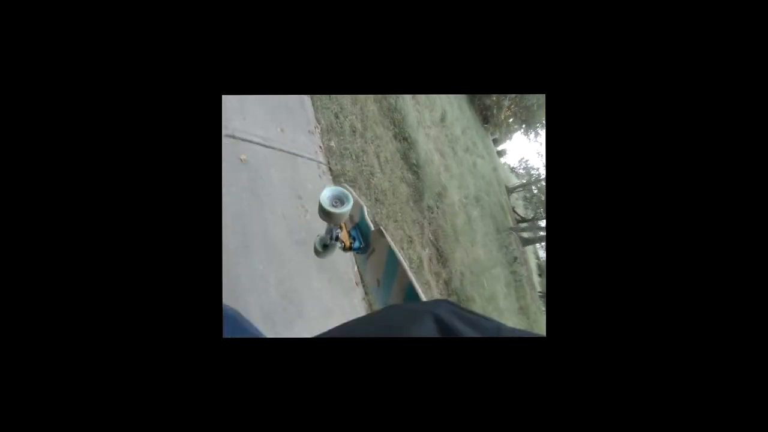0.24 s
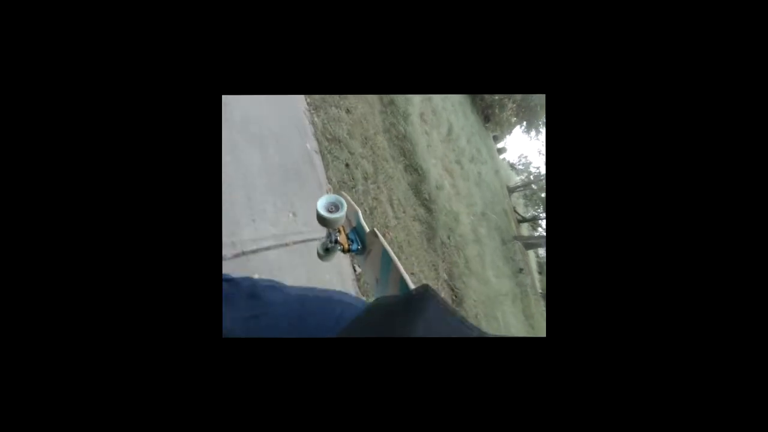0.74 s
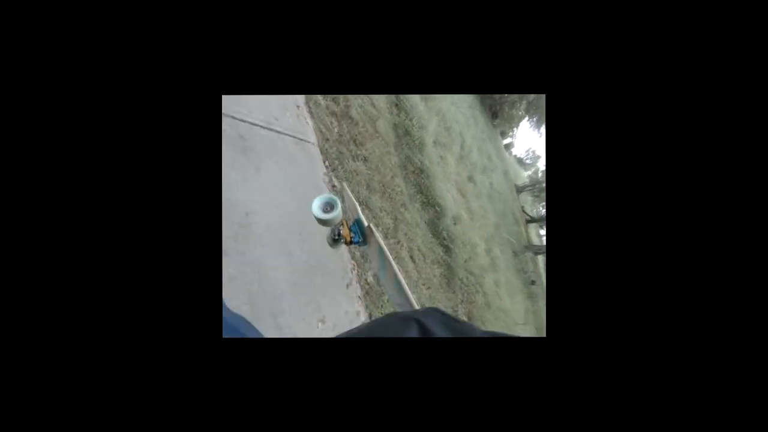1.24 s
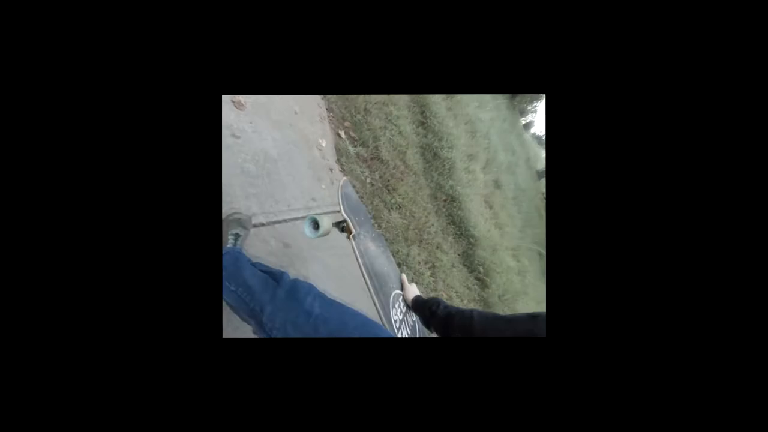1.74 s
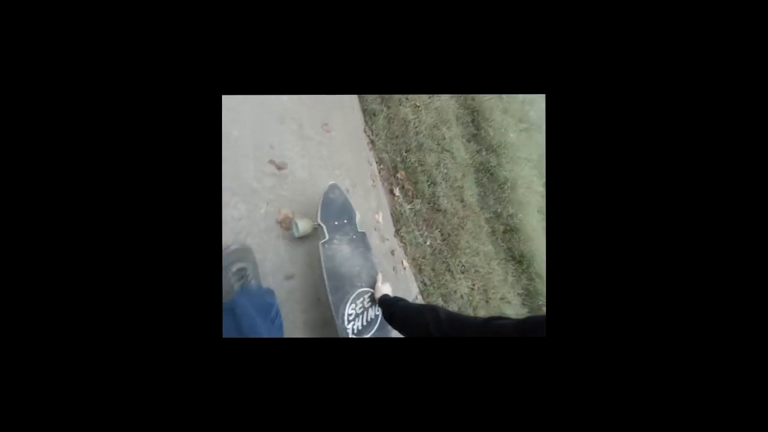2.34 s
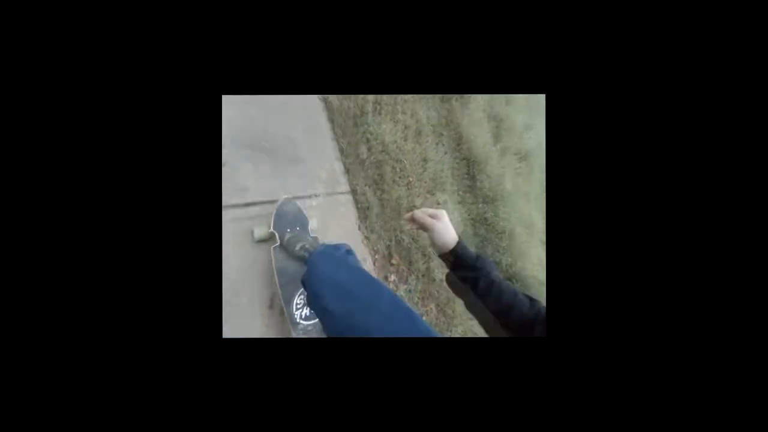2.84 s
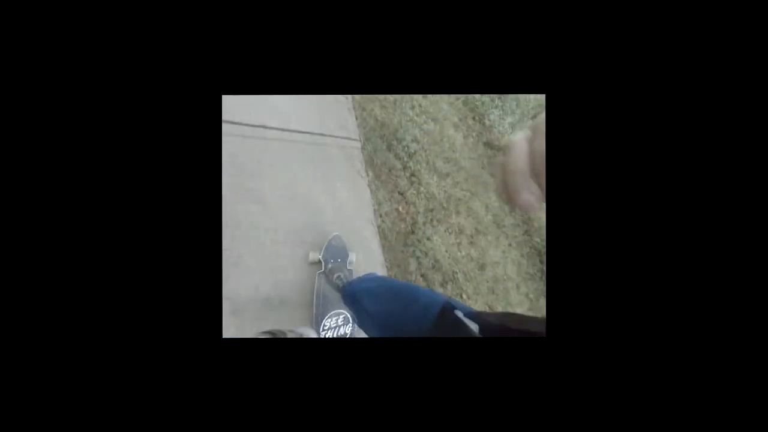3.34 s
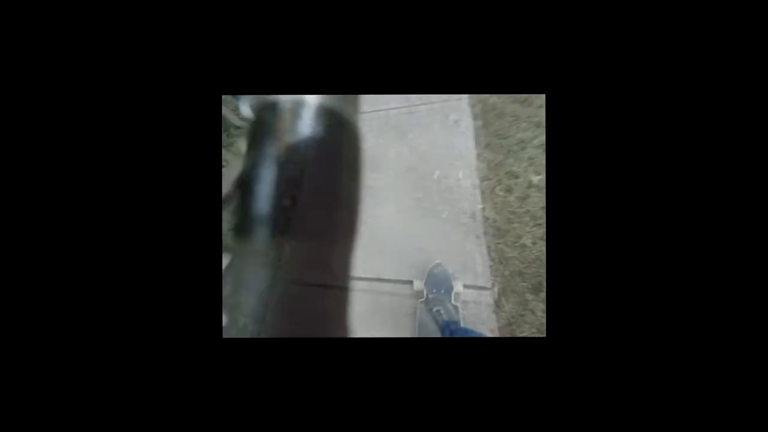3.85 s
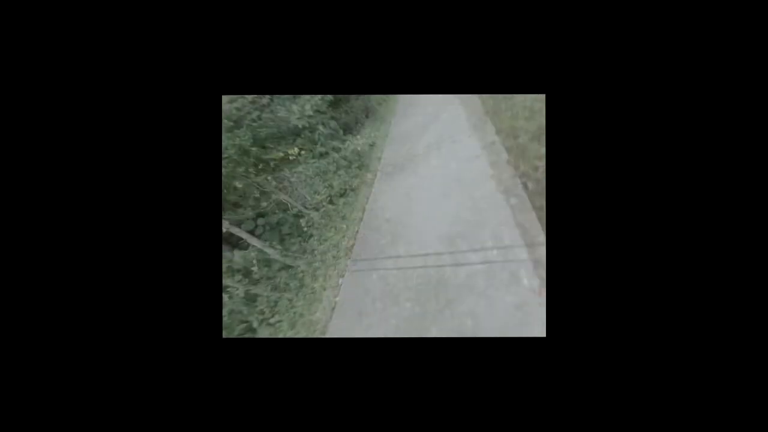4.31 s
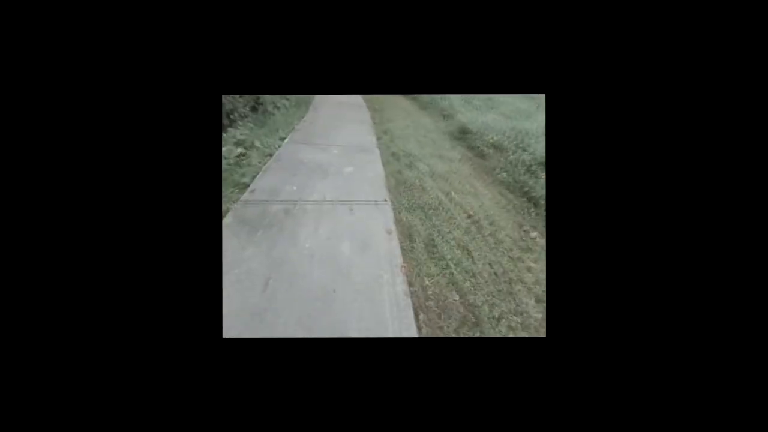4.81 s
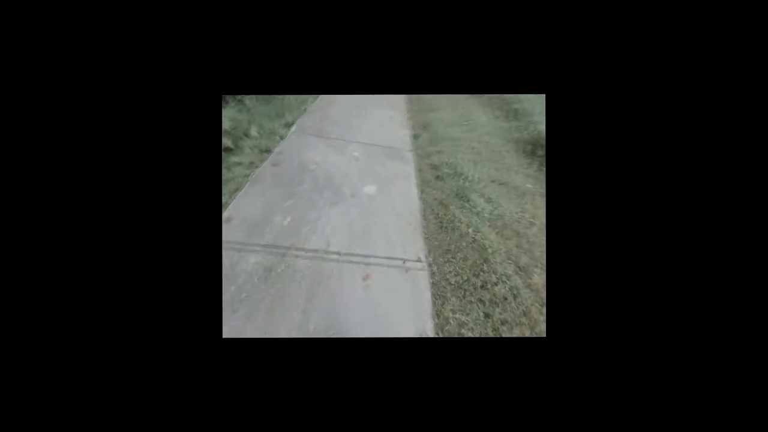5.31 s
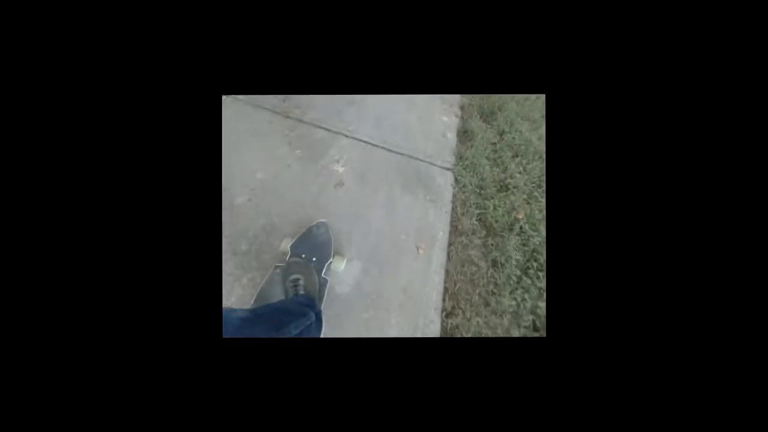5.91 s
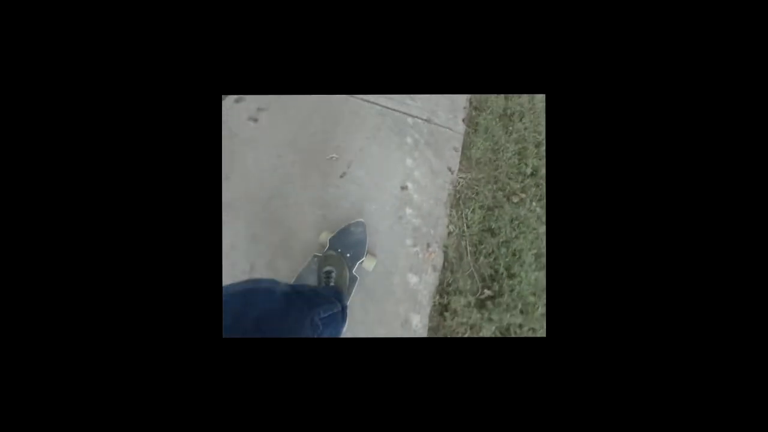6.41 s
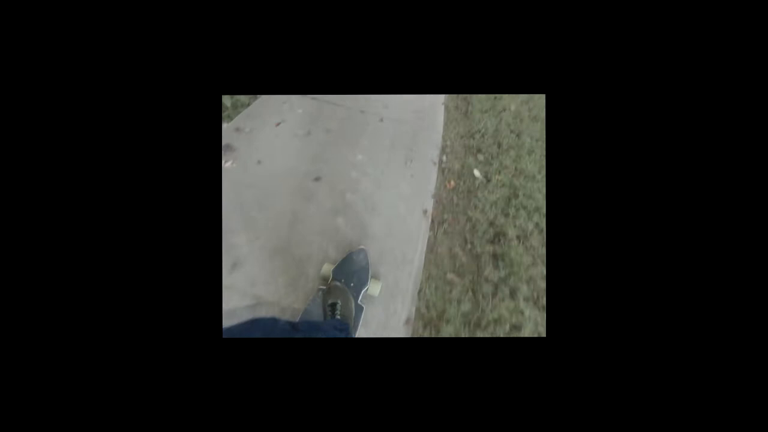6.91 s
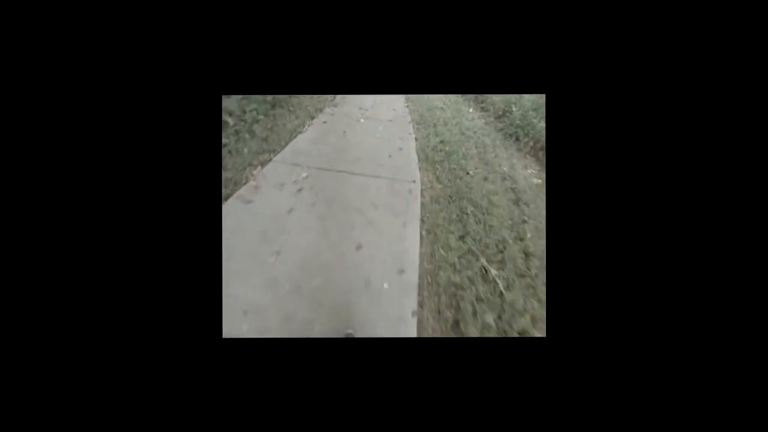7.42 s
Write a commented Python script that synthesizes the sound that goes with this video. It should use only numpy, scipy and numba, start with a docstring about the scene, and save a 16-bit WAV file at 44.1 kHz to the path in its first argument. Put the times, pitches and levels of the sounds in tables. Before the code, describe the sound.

A handheld stereo microphone hears a quiet outdoor path: distant traffic, leaves and soft wind rumble. From 0.2 to 2.3 s, shoes crunch sparsely over grit, with scuffs, dull heel thumps near 1.9 s, tiny dry high rattles and faint gliding bird whistles during the first 1.3 s. At about 2.4 s a longboard drops onto concrete in a rapid hollow clatter with a short woody ring, already rolling. Scrapes and gritty steps follow as the rider mounts around 2.9-3.2 s. The deck then rumbles low and rough, slab joints knocking every 0.3-0.5 s as tight clusters of thuds with small metallic ticks. From 3.3 to 4.6 s, creaks, sharp plastic clicks and rubbing on the microphone housing are loud and close. Afterwards handling thins out; rolling swells, with especially heavy knocks near 4.8, 5.25, 6.3, 6.9 and 7.4 s, continuing to the cut at about 7.7 s.

```python
"""Longboard rolling off over slab joints

A walker crunches over grit, drops a longboard, steps on and rolls along a concrete path.
Noise from the concrete drives the deck modes; the dropped board and grooved joints strike them.
Grit, rubbing and the creaking hand-held housing are noise bursts, many ringing cavities at its two ports.
A dry high rattle, gliding bird whistles, heel thumps, far traffic and leaves, and wind rumble complete it.
"""
import sys
import numpy as np
from scipy import signal
from scipy.fft import rfft, irfft
from scipy.io import wavfile
from scipy.ndimage import uniform_filter1d
from numba import njit

SR = 44100
rng = np.random.default_rng(int(sys.argv[2]) if len(sys.argv) > 2 else 0)


def bounce(signal):
    """Save signal as a 16-bit WAV file at the path given by the first command-line argument."""
    frames = np.transpose(np.atleast_2d(signal))
    limited = np.clip(frames, -1, 1)
    pcm = np.round(limited * 32767).astype(np.int16)
    wavfile.write(sys.argv[1], SR, pcm)


N = 337806
T = np.arange(N) / SR

# wheels on concrete: (time [s], deck rumble level [dB], wheel growl level [dB])
ROLL = [(2.395, -28, -42), (2.61, -36, -45.5), (3.09, -36.5, -43.5), (3.32, -29, -44.5), (3.72, -34.5, -65),
        (3.92, -38, -59), (4.29, -35, -53), (4.48, -42.5, -53), (4.6, -35.5, -49.5), (4.89, -36.5, -53.5),
        (5.2, -35.5, -51.5), (5.54, -33.5, -51.5), (5.85, -28.5, -45), (6.22, -27.5, -40),
        (6.4, -27, -42.5), (6.56, -27, -43), (7.04, -25.5, -44), (7.44, -28, -48), (7.66, -26.5, -45)]
# deck and trucks: (frequency [Hz], level [dB], t60 [s]); row 0 is whole-board flex, its pitch set by FLEX
DECK = [(138.2, -5.5, 0.064), (169.4, 1.5, 0.058), (233, 9.5, 0.014), (380.4, 5, 0.028), (483.5, 1, 0.042),
        (533, 0.5, 0.047), (710, -0.5, 0.02), (987, -5.5, 0.044)]
# whole-board flex as the rider's weight shifts: (time [s], pitch [Hz], level against the rumble [dB])
FLEX = [(2.4, 154, -2), (2.52, 131, -3), (2.56, 145, -6), (2.62, 121.5, -2.5), (3.35, 138.4, 3.5),
        (3.6, 129, 5.5), (3.72, 132, 13.5), (3.86, 146, 1.5), (4.48, 125, 10.5), (4.51, 149, 5.5),
        (5.15, 146, 2.5), (5.58, 164, -1), (5.68, 145, 1.5), (6.11, 151, -7.5), (6.22, 140, -8),
        (6.63, 149, -12), (6.9, 135, 4), (7.0, 136, 4), (7.16, 139, 2), (7.62, 148.5, -1), (7.66, 135, 3)]
# dropped and trodden board: (deepest swing [s], blow level [dB], singing against the blow [dB])
BOUNCES = [(2.4117, -12, -14), (2.421, -16, -20), (2.4345, -16, -3), (2.4491, -15.5, -19), (2.4558, -26, 2),
           (2.4764, -27, 11), (2.482, -21, 7.5), (2.4974, -26, -4), (2.5559, -17, -4.5), (2.602, -32, 8),
           (2.655, -34.5, 4.5), (2.737, -26, -1), (2.8085, -20, -6), (2.8151, -19.5, 0),
           (2.846, -24.5, -17), (2.92, -31, 3.5), (2.989, -24.5, -12), (3.218, -21.5, -13),
           (4.443, -28.5, -20), (4.762, -26.5, -20), (5.2389, -23, -20), (5.3693, -19, -24)]
# slab joints: (middle groove [s], blow level [dB], groove spacing [s], first groove against middle [dB],
# last groove against middle [dB], axle clack against the blow [dB])
JOINTS = [(3.031, -18.5, 0.0098, 2.5, -1.5, -22), (3.4985, -14, 0.017, -3, -12, -10.5),
          (3.9145, -15, 0.0054, 6, -35, -14.5), (4.3768, -17, 0.0073, 3, -29, -19),
          (4.789, -9.5, 0.0088, -3, -2.5, -20.5), (5.254, -10.5, 0.0084, 0.5, -14, -23),
          (5.6594, -16, 0.0092, 8, 7.5, -22.5), (6.009, -12, 0.011, 3, -5.5, -19),
          (6.3009, -10, .0136, -3, -13, -17), (6.5997, -11, 0.01051, 1.5, -6, -11.5),
          (6.8657, -5, 0.0094, -9.5, -29, -19), (7.1506, -19.5, 0.0063, 11, -3.5, -16.5),
          (7.4399, -6, 0.0067, -36, -15, -20.5)]
# sideways place of sounds from the ground: (time [s], left minus right [dB])
GROUND_PAN = [(0, 0), (1.3, -4), (2.05, -12), (2.38, -3), (3.45, -1.5), (3.72, -5), (3.95, -2), (4.48, -5),
              (4.6, -2.5), (6, 0), (7.66, -1.5)]
# grit under shoes: (time [s], crack level [dB], sole thud against the crack [dB])
GRIT = [(0.2255, -23, -4.5), (0.246, -28, -8), (0.2774, -30.5, -0.5), (0.389, -36, -10),
        (0.6858, -30, -9.5), (0.764, -29, -3), (0.7735, -30.5, -11), (0.8115, -21.5, -24),
        (0.831, -29, -10), (0.839, -30, -10), (0.8461, -22.5, -14), (0.852, -27.5, -18),
        (0.863, -25.5, -20), (1.044, -32, -5), (1.258, -48, 10.5), (1.3021, -16, -26), (1.3212, -22, 1),
        (1.439, -32, -29), (1.491, -37, -26), (1.511, -35, -13), (1.529, -31.5, -13), (1.647, -35, -5.5),
        (1.7666, -27, -7.5), (1.7922, -24.5, -5.5), (1.8112, -27.5, 1), (1.8443, -25, -9), (1.903, -37, -9),
        (1.918, -31, -11), (1.952, -27, -6.5), (1.96, -27, -12), (1.973, -29, -11), (1.993, -25.5, 0.5),
        (2.0155, -22.5, -7.5), (2.047, -29, -2.5), (2.0775, -25.5, -4.5), (2.092, -23, -10),
        (2.134, -29, -11), (2.219, -36.5, -4), (2.272, -38, -9), (2.298, -31, -12), (2.4072, -24, 5.5),
        (2.5352, -27, 1.5), (2.572, -27, -20), (2.715, -39, -3), (2.737, -37, 3), (2.76, -32.5, 1),
        (2.8022, -26, -11), (2.8184, -36, 0), (2.8738, -18, -0.5), (2.889, -20, -5), (2.909, -19, -7),
        (2.92, -26, -5), (2.9443, -29, -4), (2.9826, -32, -4), (3.0167, -36, -13), (3.0326, -30, 1.5),
        (3.093, -29, -15), (3.147, -22, -3), (3.0596, -20.5, -21), (3.1141, -23, 4), (3.18, -23.5, 3),
        (3.2169, -25, -6)]
# heels landing: (time [s], push level [dB])
HEELS = [(1.868, -33), (1.956, -19), (1.978, -22.5)]
# housing slips: (time [s], level [dB], brightness [dB], slipping part pitch [Hz], t60 [s])
CLICKS = [(3.314, -27.5, -11, 4470, 0.038), (3.4219, -24.5, -1, 4030, 0.013),
          (3.436, -42, 6.5, 3850, 0.0077), (3.444, -23.5, -1.5, 2610, 0.018),
          (3.4672, -26, 6, 4840, 0.0071), (3.534, -18.5, -3, 2650, 0.026), (3.562, -25, -5, 4200, 0.035),
          (3.605, -24, 1, 5760, 0.038), (3.6382, -31, 4, 4430, 0.023), (3.6569, -14.5, -17, 3080, 0.052),
          (3.696, -16, -1, 4420, 0.022), (3.7269, -21.5, 0.5, 3030, 0.02), (3.7395, -26, 0, 5870, 0.038),
          (3.8756, -21, -3.5, 4170, 0.047), (3.9723, -51, 3.5, 5740, 0.05),
          (3.9894, -10.5, 0.5, 2620, 0.019), (4.135, -27, 0, 2660, 0.027), (4.155, -31, -13, 2600, 0.015),
          (4.2147, -34.5, 2, 3930, 0.068), (4.2257, -13.5, -1.5, 3280, 0.013),
          (4.285, -29, -1.5, 3900, 0.022), (4.3382, -18, -3, 2900, 0.021), (4.372, -9.5, -3, 4030, 0.012),
          (4.406, -30, -3, 4000, 0.015), (4.4377, -9, -2.5, 4200, 0.024),
          (4.4484, -12.5, -4.5, 2620, 0.019), (4.5019, -11, -3, 4300, 0.018),
          (4.562, -42.5, 1.5, 4160, 0.049), (4.62, -12, 0.5, 3700, 0.015), (5.006, -35.5, 2.5, 3630, 0.013),
          (5.1665, -27, -1.5, 3870, 0.026), (5.182, -30, -3, 2600, 0.017), (5.195, -30, -10, 2600, 0.02),
          (5.2779, -28, -2.5, 3750, 0.018), (5.347, -42.5, 2.5, 2700, 0.012),
          (5.5141, -28.5, -1.5, 2420, 0.016), (5.781, -43.5, 3, 1750, 0.022),
          (5.794, -43.5, 0, 1790, 0.072), (6.112, -37.5, -0.5, 2460, 0.021),
          (6.145, -34, -1.5, 2660, 0.026), (6.1886, -48.5, 5.5, 1850, 0.022),
          (7.2848, -50.5, 7.5, 5000, 0.021), (7.56, -40.5, -0.5, 3520, 0.052)]
# slipping part, upper cavities, treble: (level at brightness 0 [dB], slope [dB per dB of brightness])
CLICK_COLOUR = [(-6, 3.5), (-1, 3), (-8, 4.5)]
# cavities around the ports: (frequency [Hz], width [Hz], level [dB], left minus right [dB])
HOUSING = [(1390, 356, 13, 1.5), (2774, 350, 3, -6), (3744, 950, 4.5, -2.5), (4880, 250, -2, 1)]
# treble cavities, same columns: (frequency [Hz], width [Hz], level [dB], left minus right [dB])
HOUSING_TOP = [(5900, 1600, -1, -11), (8520, 2120, 0.5, -3.5), (12800, 2100, -10, 1.5)]
# steady brushing of clothes: (time [s], level [dB], brightness [dB])
RUSTLE = [(0.0, -76, -45), (0.74, -74, -40), (1.77, -75, -45), (1.96, -63.5, -32), (2.24, -68.5, -29.5),
          (2.98, -56, -21.5), (3.41, -59.5, -18), (3.6, -44, -7), (3.92, -73.5, -20), (4.52, -58, -6),
          (4.97, -74.5, -1), (5.5, -55.5, -1), (5.99, -67, -7.5), (6.89, -62.5, -16.5), (7.66, -71, 6)]
# scuffing soles, sleeves on the housing: (start [s], length [s], level [dB], brightness [dB])
SCUFFS = [(0.193, 0.15, -56, -20.5), (0.73, 0.27, -55.5, -9), (0.885, 0.1, -50, -9),
          (1.278, 0.13, -51, -22), (1.427, 0.17, -60, -8), (1.725, 0.3, -60.5, -27), (1.938, 0.26, -45, -5),
          (2.376, 0.15, -43, -11.5), (2.528, 0.086, -47.5, 6), (2.854, 0.094, -37, -5),
          (2.991, 0.17, -46.5, -3), (3.088, 0.12, -50.5, -28), (3.32, 0.037, -49, -8),
          (3.433, 0.077, -47.5, 5), (3.507, 0.082, -50.5, 13), (3.66, 0.062, -35, 11),
          (3.719, 0.032, -32, 16.5), (3.73, 0.17, -52, -6), (3.838, 0.096, -43, 10),
          (4.039, 0.12, -53.5, 13), (4.126, 0.072, -40, 2.5), (4.199, 0.11, -46.5, -2),
          (4.56, 0.25, -55.5, 1), (5.152, 0.093, -52.5, -3), (5.338, 0.041, -56, 5), (5.55, 0.097, -57, -2),
          (6.117, 0.13, -61, 10), (6.634, 0.051, -60.5, 15.5), (7.263, 0.044, -39, 12),
          (7.282, 0.13, -68, 27.5), (7.545, 0.13, -58.5, 18)]
# dry high rattle: (start [s], length [s], mid-burst tick rate [per s], tick level [dB])
RATTLE = [(0.43, 0.021, 110, -40), (.91, 0.025, 190, -39.5), (1.049, .021, 100, -48),
          (1.082, 0.044, 71, -30.5), (1.131, 0.033, 136, -43.5), (1.381, 0.038, 200, -39.5),
          (1.431, 0.045, 370, -45), (1.517, 0.014, 140, -48), (2.196, 0.027, 160, -39.5),
          (2.373, 0.057, 170, -45), (2.688, 0.018, 200, -47.5), (2.891, 0.027, 180, -33),
          (3.311, 0.024, 130, -41)]
# distant birds: (start [s], length [s], from [Hz], to [Hz], level [dB])
BIRDS = [(0.36, 0.06, 3350, 3700, -57), (0.41, 0.1, 3720, 3530, -65), (0.498, 0.03, 2370, 2500, -56),
         (0.535, 0.045, 2600, 2450, -60), (0.608, 0.023, 3050, 3400, -51.5), (0.66, 0.023, 2070, 2120, -60),
         (0.97, 0.04, 2380, 2680, -58), (1.052, 0.029, 8100, 7450, -55), (1.08, 0.025, 2830, 3320, -54),
         (1.186, 0.11, 2810, 2740, -60)]
# far traffic and leaves: (frequency [Hz], relative spectral level [dB])
PARK = [(35, -13.5), (60, 2), (190, -8.5), (503, -11), (577, -15), (1450, -24), (2200, -38), (3120, -29.5),
        (7860, -56), (8820, -41), (15000, -103)]
# wind on the ports: (time [s], level [dB])
WIND = [(0, -44), (0.8, -42), (1.5, -45.5), (2.0, -44.5), (2.9, -38.5), (3.6, -37), (4.4, -34.5),
        (4.8, -48), (5.5, -48), (6.2, -50), (7.66, -43)]

# crunch level at brightness 0 [dB], its slope [dB per dB], treble level at brightness 0 [dB], its slope
RUSTLE_COLOUR, SCUFF_COLOUR = (4.5, -0.46, -1.5, 0), (1, -0.55, -7.5, 0.7852)

PORT_LAG_S = 18 / SR
STEP_ON_S = 3  # the deck is empty before this
FREE_DECK_HZ, FREE_DECK_T60_S, FREE_DECK_DB = 499, 0.16, -2
EMPTY_RUMBLE_DB = -4  # the unloaded deck rumbles less
FLEX_WANDER_DB = 1.2
FLEX_BLOW_EMPTY_DB, FLEX_BLOW_LOADED_DB = 0, 6.5
BOUNCE_CLACK_DB, TICK_DB = -16, -7.5  # against the blow, against the clack
JOINT_SING_DB = -15
SWING_S = 0.004  # a blow starts this long before the deepest swing
HISS_DB = -32.5  # wheel bearings against the rumble
DECK_SIDE_DB = -18  # upper deck modes reach the right port more strongly
GRIT_RISE_S, GRIT_SNAP_DB = 0.00027, 11.5
GRIT_TREBLE_DB, GRIT_BODY_DB = -20, -2  # treble and lowest cavity against the crack
CRACK_T60_S, TREBLE_T60_S, THUD_T60_S, GRIT_BODY_T60_S = 0.0045, 0.002, 0.057, 0.0032
HEEL_HZ, HEEL_T60_S = 109, 0.046
CLICK_RISE_S, CLICK_SNAP_DB = 0.0011, 16
PART_WIDTH_HZ, PART_PAN_DB = 340, -11.5
HANDLED_FROM_S = 3.3  # soles scrape before, the housing is rubbed after
SOLE_HZ, SOLE_DB = (1500, 3940), -3.5
BODY_DB = -11.5  # lowest cavity against the upper ones while the housing is rubbed
CRACK_MOST_DB = 3.5
RATTLE_HZ, RATTLE_T60_S, RATTLE_SPEEDUP = 8850, 0.02, 0.26
PARK_DB = -44.5
WIND_UPPER_DB, WIND_ALIKE = -9.5, 0.45
MIC_HZ, TOP_HZ = 8120, 16200
CEILING = 0.9


def board():
    """Rolling and blows shake the deck; thin decks radiate little bass, soft wheels pass little treble."""
    deck_db, growl_db = curves(ROLL)
    pan_db = curves(GROUND_PAN)[0]
    down = np.clip((T - ROLL[0][0]) / 0.029, 0, 1)
    rumble, growl = rolling(deck_db)
    deck = band(down * rumble + knocks(), 82, 824, order=3)
    heard = deck + down * undb(growl_db) * growl
    # opposite at the two ports
    side = undb(deck_db - 31.5 - 6.4 * pan_db) * down * unit(band(rng.standard_normal(N), 100, 720))
    side = side - undb(DECK_SIDE_DB) * band(np.roll(heard, int(0.00013 * SR)), 420, 900)
    hiss = unit(band(ports(0.93, lag_s=PORT_LAG_S), 1300, 2000))
    hiss = undb(deck_db + HISS_DB + 3.0 * walk(25)) * down * hiss
    panned = heard * undb(np.array([pan_db, -pan_db]) / 2)
    return panned + side * np.array([[1], [-1]]) + axle_clacks() + hiss


def rolling(deck_db):
    """Rough concrete, as uneven noise, excites deck modes, moving flex, the free deck and wheel growl."""
    flex_hz, share_db = curves(FLEX)
    flex_db = deck_db + share_db + FLEX_WANDER_DB * walk(3.25)
    road = undb(1.5 * walk(60)) * rng.standard_normal(N)
    modes = sum(undb(db) * unit(ring(road, hz, t60)) for hz, db, t60 in DECK[1:6])
    rumble = undb(deck_db + EMPTY_RUMBLE_DB * (T < STEP_ON_S)) * unit(band(modes, 84, 715, order=3))
    rumble = rumble + undb(flex_db) * unit(glide(road, flex_hz, DECK[0][2]))
    free = np.clip((STEP_ON_S - T) / 0.047, 0, 1) * unit(ring(road, FREE_DECK_HZ, FREE_DECK_T60_S))
    rumble = rumble + undb(deck_db + FREE_DECK_DB) * free
    growl = unit(undb(1.5 * walk(21)) * band(road, 582, 960, order=3))
    return rumble, growl


def knocks():
    """Each blow is a short soft push that rings the flex, the deck modes and a singing pair."""
    s, db, _, sing_db = blows()
    starts = ((s - SWING_S) * SR).astype(int)
    taps, sing = np.zeros(N), np.zeros(N)
    taps[starts] = -undb(db)
    sing[starts] = -undb(db + sing_db)
    flex = taps * undb(np.where(T < STEP_ON_S, FLEX_BLOW_EMPTY_DB, FLEX_BLOW_LOADED_DB))
    knock = undb(DECK[0][1]) * glide(flex, curves(FLEX)[0], DECK[0][2])
    # neighbouring modes swing opposite ways at the wheel
    for k, (hz, mode_db, t60) in enumerate(DECK[1:]):
        knock = knock + (-1) ** (k + 1) * undb(mode_db) * ring(taps, hz, t60)
    knock = knock + ring(sing, FREE_DECK_HZ, FREE_DECK_T60_S)
    knock = knock + undb(-4.0) * ring(sing, 1.09 * FREE_DECK_HZ, 0.56 * FREE_DECK_T60_S)
    push = np.hanning(int(0.0011 * SR))
    return np.convolve(knock, push / push.sum())[:N]


def axle_clacks():
    """Axle hardware answers each blow with a short high tick and a longer clack of noise."""
    s, db, clack_db, _ = blows()
    clack = bursts(s - 0.002, db + clack_db, 0.043, 0) * unit(band(ports(0.72), 320, 1256))
    tick = bursts(s - SWING_S, db + clack_db + TICK_DB, 0.0048, 0) * unit(band(ports(0.52), 1900, 4500))
    return clack + tick


def blows():
    """Times [s], levels, clack shares and singing shares [dB] of bounces and of three grooves a joint."""
    rows = [(s, db, BOUNCE_CLACK_DB, sing_db) for s, db, sing_db in BOUNCES]
    for s, db, gap_s, first_db, last_db, clack_db in JOINTS:
        for k, share_db in ((-0.986, first_db), (0, 0), (0.88, last_db)):
            rows.append((s + k * gap_s, db + share_db, clack_db, JOINT_SING_DB))
    return np.transpose(rows)


def grit():
    """Each crack is milliseconds of noise with a snap, a dull sole thud and a ringing lowest cavity."""
    s, db, thud_db = np.transpose(GRIT)
    pan_db = np.interp(s, *np.transpose(GROUND_PAN))
    noise = ports(0.91, lag_s=-0.00027)
    noise[:, ((s + GRIT_RISE_S) * SR).astype(int)] -= undb(GRIT_SNAP_DB)
    crack = bursts(s, db, CRACK_T60_S, pan_db) * noise
    treble = bursts(s, db + GRIT_TREBLE_DB, TREBLE_T60_S, pan_db) * noise
    thud = bursts(s, db + thud_db, THUD_T60_S, pan_db) * ports(0.87)
    body = bursts(s, db + GRIT_BODY_DB, GRIT_BODY_T60_S, pan_db) * ports(1.0, lag_s=PORT_LAG_S)
    out = full_band(crack, 1000, 3090) + full_band(treble, 4600, 5160) + full_band(thud, 68, 1006)
    return out + cavities(body, HOUSING[:1])


def heels():
    """A heel pushes the ground once, softly: one low mode, smoothed."""
    s, db = np.transpose(HEELS)
    taps = np.zeros(N)
    taps[(s * SR).astype(int)] = undb(db)
    return uniform_filter1d(ring(taps, HEEL_HZ, HEEL_T60_S), size=40) * pan(-13.0)


def clicks():
    """Plastic parts slip near the right port, each at its own pitch; bright slips ring high cavities more."""
    s, db, bright_db, hz, t60 = np.transpose(CLICKS)
    starts = (s * SR).astype(int)
    part_db, upper_db, top_db = (base_db + slope * bright_db for base_db, slope in CLICK_COLOUR)
    noise = ports(0.7, lag_s=PORT_LAG_S)
    for i in starts + int(CLICK_RISE_S * SR):  # each slip lets go with one snap
        noise[[0, 1], [i + int(PORT_LAG_S * SR), i]] += undb(CLICK_SNAP_DB)
    out = np.zeros((2, N))
    for share_db, modes in ((0, HOUSING[:1]), (upper_db, HOUSING[1:]), (top_db, HOUSING_TOP)):
        out += cavities(bursts(s, db + share_db, t60, 0, CLICK_RISE_S) * noise, modes)
    slip = bursts(s, db + part_db, t60, 0, CLICK_RISE_S) * noise
    edges = np.append(starts, N)
    for a, b, part_hz in zip(edges[:-1], edges[1:], hz):
        out[:, a:b] += cavities(slip[:, a:b], [(part_hz, PART_WIDTH_HZ, 0, PART_PAN_DB)])
    return out


def rustle():
    """Rubbing: grainy noise scrapes under soles or rings the cavities, with a dull crunch below."""
    gains = colours(*curves(RUSTLE), RUSTLE_COLOUR)
    for s, length_s, db, bright_db in SCUFFS:
        u = np.clip((T - s) / length_s, 0, 1)
        contact = np.minimum(1, u / 0.2) * (1 - u ** 2.28)  # comes suddenly, eases off
        gains = gains + colours(db, bright_db, SCUFF_COLOUR)[:, None] * contact
    low, middle, top = gains
    shared = undb(1.8 * walk(150))
    a, b, c, d = (unit(slips(shared) * ports(alike, lag_s=PORT_LAG_S))
                  for alike in (0.87, 0.33, 0.099, 0.1))
    crunch = cavities(a, HOUSING[:1]) + undb(15.0) * band(b, 570, 1260, order=1)
    sole = undb(SOLE_DB) * pan(-4.0) * unit(band(b + c, *SOLE_HZ, order=1))
    housing = cavities(b + c, HOUSING[1:]) + undb(BODY_DB) * cavities(a, HOUSING[:1])
    rub = np.where(T < HANDLED_FROM_S, sole, housing)
    return low * unit(crunch) + middle * rub + top * cavities(c + d, HOUSING_TOP)


def slips(shared):
    """Grain of a rubbing contact: own flicker and scattered small cracks on a shared unevenness."""
    crack_db = np.minimum(12.0 * rng.exponential(size=N), CRACK_MOST_DB)
    cracks = (rng.random(N) < 160 / SR) * undb(crack_db)
    cracks = signal.lfilter([1], [1, -np.exp(-1 / (0.00098 * SR))], cracks)
    flicker = undb(1.1 * walk(300) + 3.1 * walk(40))
    return shared * flicker * (1 + 1.5 * cracks)


def colours(db, bright_db, colour):
    """Gains of crunch, middle and treble of a rub."""
    low_db, low_slope, top_db, top_slope = colour
    return undb([db + low_db + low_slope * bright_db, db, db + top_db + top_slope * bright_db])


def rattle():
    """Runs of quickening ticks into two short high modes."""
    ticks = np.zeros(N)
    for s, length_s, rate, db in RATTLE:
        t = 0.
        for level_chance, gap_chance in rng.standard_normal((20, 2)):
            if t < length_s:
                ticks[int((s + t) * SR)] = undb(db + 0.91 * level_chance)
            rate_now = rate * (1 + RATTLE_SPEEDUP * (t / length_s - 0.5))
            t += (1 + 0.036 * gap_chance) / rate_now
    ticks = band(ticks, 8560, 10400)
    upper = ring(ticks, 1.04 * RATTLE_HZ, 0.2 * RATTLE_T60_S)
    return (ring(ticks, RATTLE_HZ, RATTLE_T60_S) + upper) * pan(-2.5)


def birds():
    """Short whistles: sines whose pitch glides fast, then slower."""
    out = np.zeros(N)
    for s, length_s, from_hz, to_hz, db in BIRDS:
        u = np.linspace(0, 1, int(length_s * SR))
        hz = to_hz + (from_hz - to_hz) * (1 - u) ** 1.5
        swell = np.sqrt(np.sin(np.pi * u) + 1e-9)
        i = int(s * SR)
        out[i:i + len(u)] += undb(db) * swell * np.sin(2 * np.pi * np.cumsum(hz) / SR)
    return out


def park():
    """Far traffic and leaves as shaped noise; gusty wind as low rumble on the ports."""
    hz = np.maximum(np.fft.rfftfreq(N, 1 / SR), 1)
    shape_hz, shape_db = np.transpose(PARK)
    shape = undb(np.interp(np.log(hz), np.log(shape_hz), shape_db))
    far = undb(PARK_DB + 2.2 * walk(25)) * unit(irfft(rfft(ports(0.98)) * shape, N))
    lower = unit(band(ports(WIND_ALIKE), 22, 45))
    upper = undb(WIND_UPPER_DB + 4.5 * walk(3.7)) * unit(band(ports(0.3), 40, 130))
    return far + undb(curves(WIND)[0]) * pan(-2.5) * (lower + upper)


def undb(db):
    """dB to gain."""
    return 10 ** (np.asarray(db) / 20)


def unit(x):
    """Scale to rms 1."""
    return x / np.sqrt(np.mean(x ** 2))


def curves(table):
    """Columns of a table drawn over time."""
    s, *columns = np.transpose(table)
    return [np.interp(T, s, c) for c in columns]


def pan(db):
    """Left and right gains for a level difference."""
    return undb(np.array([[db / 2], [-db / 2]]))


def ring(x, hz, t60):
    """One mode: an impulse becomes a dying sine."""
    r, w = np.exp(-np.log(1000) / (t60 * SR)), 2 * np.pi * hz / SR
    return signal.lfilter([0, np.sin(w)], [1, -2 * r * np.cos(w), r * r], x)


def glide(x, hz, t60):
    """One mode whose pitch moves along hz."""
    turn = np.exp(2j * np.pi * np.cumsum(hz) / SR)
    decay = np.exp(-np.log(1000) / (t60 * SR))
    return (turn * signal.lfilter([1], [1, -decay], x / turn)).imag


def cavities(x, modes):
    """Broad resonances with steep skirts; white noise of rms 1 leaves near rms 1."""
    out, power = 0, 0
    for hz, width_hz, db, pan_db in modes:
        b, a = signal.iirpeak(hz, hz / width_hz, SR)
        out = out + undb(db) * pan(pan_db) * signal.lfilter(b, a, signal.lfilter(b, a, x))
        power += undb(db) ** 2 * np.pi / 2 * width_hz / SR
    return out / np.sqrt(power)


def band(x, lo_hz, hi_hz, order=2):
    """Band-pass."""
    return signal.sosfilt(signal.butter(order, [lo_hz, hi_hz], "band", fs=SR, output="sos"), x)


def full_band(x, lo_hz, hi_hz):
    """Band-pass raised to about the power of the white noise fed in."""
    return band(x, lo_hz, hi_hz) * np.sqrt(SR / 2 / (hi_hz - lo_hz))


def walk(rate):
    """Random levels held 1 / rate s and smoothed twice; rms 1."""
    k = int(SR / rate)
    steps = np.repeat(rng.standard_normal(N // k + 1), k)
    return unit(uniform_filter1d(uniform_filter1d(steps, k), k)[:N])


def ports(alike, lag_s=0.):
    """Noise at both ports, partly shared, the left late by lag_s."""
    shared, own = rng.standard_normal(N), rng.standard_normal((2, N))
    both = np.array([np.roll(shared, int(lag_s * SR)), shared])
    return np.sqrt(alike) * both + np.sqrt(1 - alike) * own


def bursts(times, gains_db, t60s, pans_db, rise_s=GRIT_RISE_S):
    """Envelope of bursts that rise linearly and die exponentially, each cut after its t60."""
    env = np.zeros((2, N + SR))
    for s, db, t60, pan_db in zip(*np.broadcast_arrays(times, gains_db, t60s, pans_db)):
        t = np.arange(int(t60 * SR)) / SR
        shape = np.minimum(1, t / rise_s) * np.exp(-np.log(1000) * t / t60)
        i = int(s * SR)
        env[:, i:i + len(t)] += undb(db) * pan(pan_db) * shape
    return env[:, :N]


def scene():
    """All sources at the two ports."""
    return board() + grit() + heels() + clicks() + rustle() + rattle() + birds() + park()


@njit
def follow(x, attack, release):
    """Peak follower."""
    e, out = 0., np.empty(len(x))
    for i in range(len(x)):
        e += (x[i] - e) * (attack if x[i] > e else release)
        out[i] = e
    return out


def record(dry):
    """Microphones lose treble; gain control ducks loud hits; peaks are rounded; the top is cut."""
    dry = signal.sosfilt(signal.butter(3, MIC_HZ, fs=SR, output="sos"), dry)
    env = follow(np.abs(dry).max(axis=0), 1 / (0.0058 * SR), 1 / (0.08 * SR))
    gain = np.minimum(1, undb(-11.0) / (env + 1e-9))
    rounded = CEILING * np.tanh(dry * gain / CEILING)
    return signal.sosfilt(signal.ellip(8, 0.2, 70, TOP_HZ, fs=SR, output="sos"), rounded)


dry = scene()
out = record(dry)
bounce(out)
```